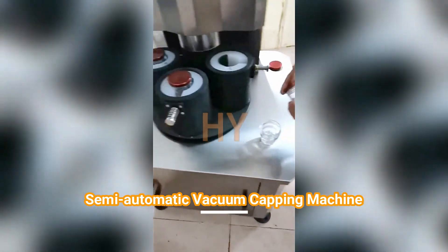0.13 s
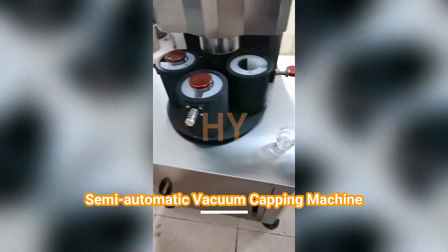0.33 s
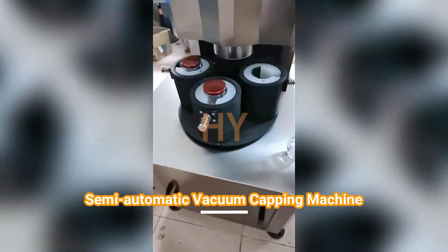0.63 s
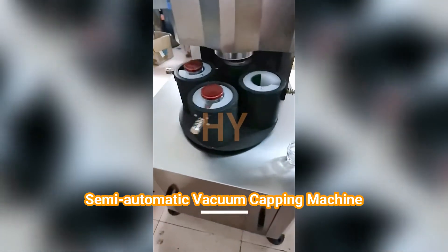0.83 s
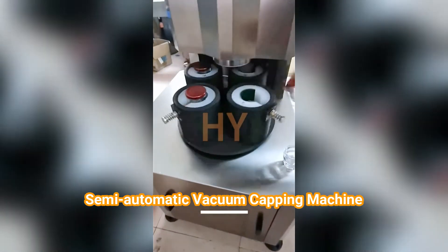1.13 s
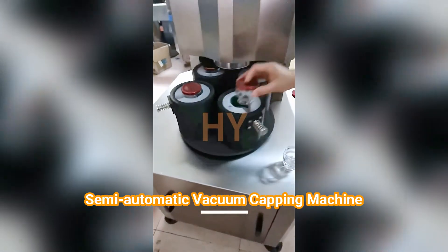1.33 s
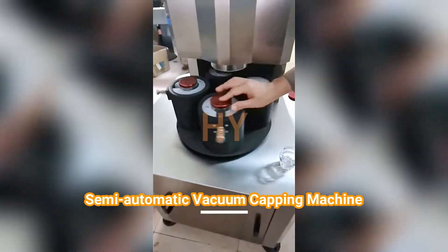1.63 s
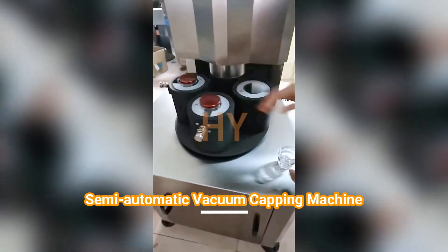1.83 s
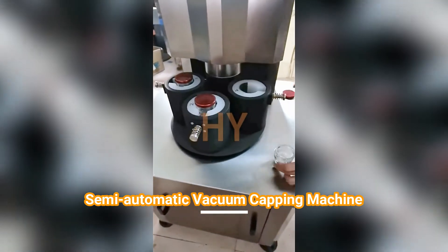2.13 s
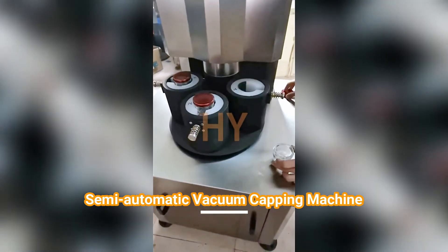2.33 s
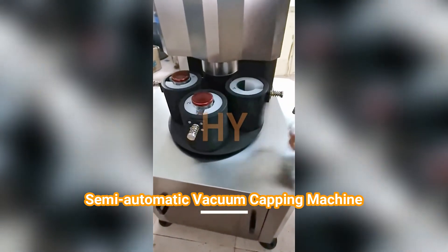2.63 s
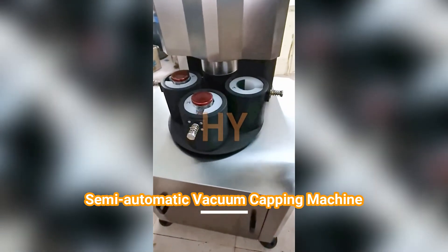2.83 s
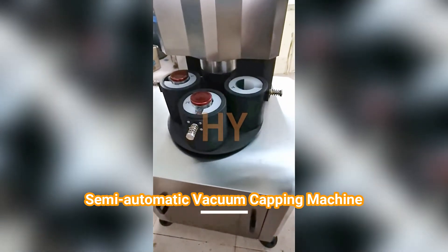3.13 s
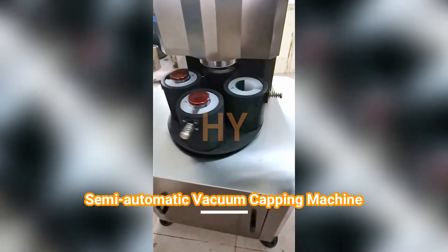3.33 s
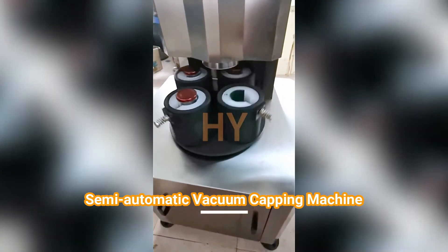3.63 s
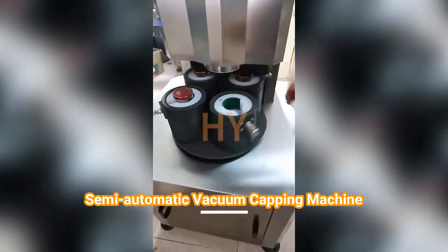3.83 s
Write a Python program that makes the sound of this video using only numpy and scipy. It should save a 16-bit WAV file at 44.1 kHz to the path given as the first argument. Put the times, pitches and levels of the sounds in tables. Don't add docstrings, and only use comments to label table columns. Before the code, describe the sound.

Close stereo microphone on a jar capping machine in a hard room: sharp air bursts, heavy metallic strokes and low cabinet ringing, a glass jar bouncing midway, then quick hisses and thuds over a starting pump hum.

```python
import sys
import numpy as np
from scipy import signal
from scipy.fft import rfft, irfft, next_fast_len
from scipy.io import wavfile
from scipy.ndimage import uniform_filter1d, map_coordinates

SR = 44100
rng = np.random.default_rng(int(sys.argv[2]) if len(sys.argv) > 2 else 0)


def natural_amplitude(level_db):
    exponent = np.asarray(level_db, float) / 20
    return 10 ** exponent


def unload_wav(signal):
    wavfile.write(
        sys.argv[1],
        SR,
        np.round(np.clip(np.atleast_2d(signal).T, -1, 1) * 32767).astype(np.int16),
    )


N = 176400
T = np.arange(N) / SR


def unit(x):
    return x / np.sqrt(np.mean(x ** 2) + 1e-20)


def along(points, hz):
    f, v = np.transpose(points)
    return np.interp(np.log(hz + 1), np.log(f + 1), v)


def wobble(rate_per_s):
    knots = rng.standard_normal(int(N * rate_per_s / SR) + 4)
    return map_coordinates(knots, [T * rate_per_s])


def filtered(x, response):
    m = next_fast_len(N + SR)
    return irfft(rfft(x, m) * response(np.fft.rfftfreq(m, 1 / SR)), m)[..., :N]


def body(peaks):
    def response(f):
        total = 0
        for k, (hz, width_hz, db) in enumerate(peaks):
            damping = 1j * f * width_hz
            total = total + (-1) ** k * natural_amplitude(db) * damping / (hz * hz - f * f + damping)
        return total
    return response


def power_of(peaks):
    return lambda hz: abs(body(peaks)(hz)) ** 2


def fade(start_s, rise_s, hold_s, t60_s):
    u = np.maximum(T - start_s, 0)
    return -np.expm1(-u / rise_s) * np.exp(-np.log(1000) * np.maximum(u - hold_s, 0) / t60_s)


def ring(start_s, hz, t60_s, hold_s=0):
    return fade(start_s, 0.00049 + 0.28 / hz, hold_s, t60_s) * np.sin(2 * np.pi * hz * (T - start_s))


def taps(rows):
    s, db = np.transpose(rows)
    return np.bincount(np.round(s * SR).astype(int), natural_amplitude(db), N)


# (frequency [Hz], correlation [0-1])
LIKENESS = [(60, 0.51), (290, 0.93), (640, 0.44), (1400, 0.1), (3100, 0.14), (15000, 0)]


def rush(gain, patchy_db):
    z = signal.stft(rng.standard_normal((2, N)), nperseg=512)[2]
    field = uniform_filter1d(uniform_filter1d(rng.standard_normal(z.shape[1:]), 6, 0), 8, 1)
    pair = signal.istft(z * natural_amplitude(patchy_db * unit(field)), nperseg=512)[1][:, :N]

    def spread(hz):
        turn = np.arccos(np.clip(along(LIKENESS, hz), -1, 1)) / 2
        return gain(hz) * np.array([np.cos(turn), np.sin(turn)])

    mid, side = filtered(pair, spread)
    return unit(np.array([mid + side, mid - side]))


# (time [s], peak [dB], body [dB], t60 [s], whistle [dB])
PUFFS = [(0.0, -29, -1.5, 0.6, -37), (0.0518, -31.5, 0, 0.4, 3), (0.1433, -23, 3.5, 0.88, -9),
         (0.546, -13, -10, 0.63, -11.5), (1.7422, -14, -5.5, 0.7, -12), (2.0485, -23, 0, 0.46, -9),
         (2.3466, -22.5, -4, 0.43, -9), (2.656, -21, 3.5, 0.7, -31), (2.786, -31, 9.5, 1, -14),
         (2.9632, -38, -6, 0.45, -14), (3.051, -13, -14, 0.59, -15)]
# (time [s], level [dB], hold [s])
VENTS = [
    (0.755, -37.5, 0.15),
    (3.252, -36, 0.17),
]
# (frequency [Hz], density [dB per Hz])
JET = [(530, -3), (900, -6.5), (1160, -9.5), (2320, -7), (5910, 1.5), (7700, -5), (8370, -10), (13800, -4),
       (15800, -3)]
# (frequency [Hz], width [Hz], level [dB])
WHISTLES = [(4127, 650, 6.5), (5570, 390, -14.5), (7100, 300, -28)]


def valves():
    trim_db, lead_s, rise_s, hold_s = -8.5, 0.0094, 0.0067, 0.013
    spit_db, spit_t60_s = 2, 0.22
    jet_from_hz = 3700
    vent = sum(natural_amplitude(db) * fade(s, 0.004, hold, 0.36) for s, db, hold in VENTS)
    swell = natural_amplitude(-36) * fade(2.545, 0.022, 0.068, 0.41)
    hiss, full, sung = vent + swell, vent + swell, natural_amplitude(-9) * vent + natural_amplitude(-1) * swell
    for s, db, body_db, t60_s, whistle_db in PUFFS:
        start_s = s - lead_s
        opening = fade(start_s, rise_s, 9, 1) ** 2
        bleed = fade(start_s, rise_s, hold_s, t60_s)
        spit = natural_amplitude(spit_db) * fade(start_s, rise_s, 0, spit_t60_s)
        puff = natural_amplitude(db + trim_db) * opening * (bleed + spit)
        hiss = hiss + puff
        full = full + natural_amplitude(body_db) * puff
        sung = sung + natural_amplitude(whistle_db) * puff

    def top(hz):
        return hz ** 4 / (hz ** 4 + jet_from_hz ** 4)

    jet = rush(lambda hz: natural_amplitude(along(JET, hz)) * top(hz), patchy_db=1.5)
    low = rush(lambda hz: natural_amplitude(along(JET, hz)) * (1 - top(hz)) * (hz > 500), patchy_db=0.5)
    gritty_low = natural_amplitude(3 * wobble(250) - 6.5) * low
    whistle = rush(power_of(WHISTLES), patchy_db=1)
    return hiss * jet + full * gritty_low + sung * whistle


# (time [s], peak [dB], boom [dB], clang [dB], rattle [s])
CLUNKS = [
    (.001, -24, 15, 3, 0.0098),
    (0.606, -9, -6, -5.5, 0.031),
    (.733, -8, 2, -9, 0.02),
    (1.845, -17.5, -5, -1, 0.023),
    (2.408, -11.5, -14, -14.5, 0.025),
    (2.791, -15.5, -10, -21, 0.029),
    (3.107, -8, -7.5, -5, 0.015),
    (3.136, -14, -12, -0.5, 0.0095),
    (3.238, -7.5, -0.5, -7.5, 0.02),
]
# (frequency [Hz], width [Hz], level [dB])
CABINET = [(113.5, 1.94, -0.5), (141.5, 1.64, -3.5), (215, 1.85, -1), (230.3, 5.9, -10),
           (280.4, 0.95, -4.5), (302.7, 1.55, -11.5)]
# (frequency [Hz], width [Hz], level [dB])
PANEL = [(154, 77, -5.5), (231.6, 41, 2.5), (697, 96, -8)]
# (frequency [Hz], width [Hz], level [dB])
PLATE = [(960, 340, -2), (1875, 290, -3.5), (2200, 126, 4.5), (2980, 1300, -6), (3800, 490, -1.5),
         (4700, 1840, -12)]


def pistons():
    lead_s, boom_late_s = 0.0089, 0.012
    blow_db, boom_db, clang_tap_db = 41.5, 64, 13
    scrape_db, rattle_db = 18.5, 6
    grit = unit(rng.standard_normal(N) * natural_amplitude(4.6 * wobble(300)))
    scrape, rattle = 0, 0
    for s, db, _, clang_db, rattle_s in CLUNKS:
        contact = natural_amplitude(db) * fade(s - lead_s, 0.00033, rattle_s, 0.044)
        scrape = scrape + contact
        rattle = rattle + natural_amplitude(clang_db) * contact
    blows = taps([(s, db + blow_db) for s, db, *_ in CLUNKS]) + natural_amplitude(scrape_db) * scrape * grit
    clangs = taps([(s, db + clang_db + clang_tap_db) for s, db, _, clang_db, _ in CLUNKS])
    clangs = clangs + natural_amplitude(rattle_db) * rattle * grit
    booms = taps([(s + boom_late_s, db + low_db + boom_db) for s, db, low_db, *_ in CLUNKS])
    panel = filtered(blows, lambda hz: body(PANEL)(hz) / (1 + 1j * hz / 500) ** 2)
    cabinet = filtered(booms, lambda hz: body(CABINET)(hz) / (1 + 1j * hz / 700) ** 2)
    shudder = natural_amplitude(3.5 * wobble(30) - 1.0)
    return panel + shudder * cabinet, filtered(clangs, body(PLATE))


# (time [s], peak [dB], ring [dB])
SPOOLS = [
    (.143, -8.5, -18),
    (.54, -25.5, -10),
    (1.737, -14.5, -19),
    (2.046, -16, -35),
    (2.381, -13, -20),
    (2.556, -21.5, -43),
    (2.645, -11, -17),
    (2.722, -9.5, -38),
]


def spools():
    total = 0
    for s, db, ring_db in SPOOLS:
        thud = ring(s, 93.6, 0.19)
        hollow = ring(s + 0.00627, 635, 0.07, 0.03)
        total = total + natural_amplitude(db) * (thud + natural_amplitude(ring_db) * hollow)
    return total


# (time [s], peak [dB], frequency [Hz], t60 [s])
PINGS = [(.024, -21, 1036, 0.021), (.628, -15.5, 2210, 0.063), (.728, -13.5, 610, 0.023),
         (0.733, -7, 186, .05), (.749, -17.5, 526, 0.17), (.79, -25.5, 397, 0.37), (1.748, -27, 6700, .08),
         (1.751, -27, 5840, 0.13), (1.756, -13.5, 2216, 0.094), (1.782, -18, 2170, 0.04),
         (1.84, -9.5, 2327, 0.063), (1.841, -10, 3580, 0.027), (1.843, -16, 1820, 0.077),
         (1.846, -7, 2246, 0.034), (1.859, -25, 1585, 0.091), (1.87, -23.5, 2280, .12),
         (1.962, -28.5, 2290, 0.073), (2.06, -28, 635, 0.028), (2.064, -25, 1100, 0.046),
         (2.079, -28.5, 650, .04), (2.116, -28, 897, 0.12), (2.348, -24.5, 115, 0.078),
         (2.41, -29.5, 525, 0.48), (2.496, -15.5, 110, 0.059), (2.66, -27, 615, .1),
         (2.776, -19, 613, 0.11), (2.799, -19, 1170, 0.055), (3.103, -14, 215, 0.053),
         (3.131, -19, 2300, .04), (3.236, -8, 191, 0.056), (3.239, -17.5, 2196, 0.056),
         (3.25, -17, 521, 0.13)]
# (time [s], peak [dB])
CLICKS = [
    (0.214, -13),
    (.451, -11),
    (0.609, -12),
    (1.84, -18),
    (3.102, -11),
    (3.132, -18),
]


def pings():
    modes = sum(natural_amplitude(db) * ring(s, hz, t60_s, 0.002) for s, db, hz, t60_s in PINGS)
    clicks = sum(natural_amplitude(db) * fade(s, 0.00088, 0.0012, 0.026) for s, db in CLICKS) * rng.standard_normal(N)
    dry_clicks = filtered(clicks, lambda hz: 1j * hz / (1j * hz + 600) / (1 + 1j * hz / 6960))
    return natural_amplitude(1.5 * wobble(150)) * modes + dry_clicks


# (time [s], peak [dB], low mode [Hz], high mode [Hz], high mode [dB])
TICKS = [
    (.025, -28, 1044, 3600, 1),
    (0.051, -24, 1015, 3630, -6),
    (.215, -29, 1340, 3750, 4),
    (.329, -20.5, 1025, 4013, 2.5),
    (0.45, -26.5, 1358, 5500, -8.5),
    (1.478, -41.5, 1000, 2050, -17),
    (1.701, -38, 1100, 2200, -23),
    (2.73, -22, 1184, 3400, -17),
    (2.965, -27.5, 980, 1600, 2.5),
    (3.072, -23.5, 1030, 1460, -12),
]


def ticks():
    t60_s, hold_s = 0.014, 0.004
    small, snaps = 0, 0
    for s, db, low_hz, high_hz, high_db in TICKS:
        low = ring(s, low_hz, t60_s, hold_s) + 0.9 * ring(s, 1.44 * low_hz, t60_s)
        high = natural_amplitude(high_db) * ring(s, high_hz, t60_s, hold_s)
        small = small + natural_amplitude(db + 4.5) * (low + high)
        snap = fade(s, 0.0039, hold_s, 0.022) + natural_amplitude(-34) * fade(s, 0.015, 0, 0.16)
        snaps = snaps + natural_amplitude(db + high_db + 5.5) * snap
    dry_snaps = filtered(snaps * rng.standard_normal(N), lambda hz: 1j * hz / (1j * hz + 700))
    return natural_amplitude(4.1 * wobble(900)) * small + dry_snaps


# (time [s], peak [dB], frequency [Hz], hold [s])
CHIRPS = [
    (.052, -28, 3700, 0.011),
    (.053, -29, 4980, .01),
    (.147, -33, 3320, 0.056),
    (.23, -38.5, 3440, 0.074),
    (0.549, -22, 7600, 0.021),
    (0.561, -27, 5840, 0.015),
    (1.743, -21, 6270, .015),
    (2.349, -24.5, 4200, 0.021),
    (2.571, -31, 4100, 0.023),
    (3.049, -26, 7600, .03),
]


def chirps():
    return sum(natural_amplitude(db) * ring(s, hz, 0.13, hold_s) * wobble(500) for s, db, hz, hold_s in CHIRPS)


# (time after drop [s], level [dB])
JAR_BOUNCE = [
    (0, 3.5),
    (.004, -7),
    (.008, -18),
    (.017, -3),
    (0.023, -11.5),
]
# (frequency [Hz], width [Hz], level [dB])
JAR = [(548, 48, -11), (969, 47, 3), (1102, 26, 7.5), (1290, 180, -15), (1517, 44, 4), (2110, 140, -8.5),
       (2530, 170, -12.5), (3640, 460, -21), (4270, 230, -20), (6060, 300, -29)]
# (frequency [Hz], width [Hz], level [dB])
HOLDER = [(670, 670, 1), (1210, 590, 5), (2440, 2400, -7)]


def jar():
    drop_s, drop_db = 1.507, 28
    hits = taps([(drop_s + s, drop_db + db) for s, db in JAR_BOUNCE])
    knock = filtered(hits, lambda hz: body(JAR)(hz) / (1 + 1j * hz / 5000) ** 2)
    murmur = natural_amplitude(-28) * fade(drop_s, 0.0084, 0, 0.77) * rush(power_of(HOLDER), patchy_db=1.5)
    return knock, murmur


# (frequency [Hz], width [Hz], level [dB])
FRAME = [(78, 45, -2.5), (127, 70, 0.5), (211, 102, -2), (475, 168, -8.5), (1100, 770, -11)]


def stand():
    kicks = [(s, db + boom_db) for s, db, boom_db, *_ in CLUNKS]
    kicks += [(s, db - 3.5) for s, db, _ in SPOOLS]
    power = sum((natural_amplitude(db - 12.5) * fade(s, 0.0065, 0, 0.95)) ** 2 for s, db in kicks)
    return np.sqrt(power) * rush(power_of(FRAME), patchy_db=1.2)


# (time [s], speed [Hz], level [dB])
PUMP = [
    (2.754, 100.3, -20),
    (2.785, 99.8, -16),
    (2.9, 99.47, -15),
    (3.15, 99.83, -18),
    (3.4, 99.08, -19),
    (3.6, 99.4, -18.5),
    (4, 98.75, -19),
]
# (multiple of speed, level [dB])
PUMP_ORDERS = [(1, 1), (1.5, -38), (2, -13.5), (2.5, -37), (3, -21.5)]
# (frequency [Hz], density [dB per Hz])
PUMP_AIR = [(24, -75), (40, -25), (66, -22), (103, -1), (151, -13.5), (296, -17.5), (488, -24), (1060, -24),
            (15800, -58.5)]


def pump():
    s, hz, db = np.transpose(PUMP)
    level = natural_amplitude(np.interp(T, s, db, left=-120))
    phase = 2 * np.pi * np.cumsum(np.interp(T, s, hz) + 0.72 * wobble(11)) / SR
    hum = sum(natural_amplitude(order_db + 1.2 * k * wobble(24.84)) * np.sin(k * phase + k - 1)
              for k, order_db in PUMP_ORDERS)
    air = rush(lambda f: natural_amplitude(along(PUMP_AIR, f)), patchy_db=1.7)
    chopped = air * (1 + 0.088 * np.sin(phase))
    return level * (np.sqrt(2) * hum + natural_amplitude(-5 + 0.8 * wobble(18)) * chopped)


# (frequency [Hz], t60 [s])
ROOM = [(150, 0.67), (1000, 0.91), (4000, 0.56), (12000, 0.075)]


def room(x):
    hz, t, z = signal.stft(rng.standard_normal((2, SR)), SR, nperseg=256)
    decay = natural_amplitude(-60 * t / along(ROOM, hz)[:, None])
    tail = signal.istft(z * decay, SR, nperseg=256)[1]
    late = np.pad(x, (300, 0))[None]
    return signal.fftconvolve(late, tail / np.linalg.norm(tail[0]), axes=1)[:, :N]


# (frequency [Hz], density [dB per Hz])
HALL = [(30, -9), (70, -24), (100, -1), (180, -14.5), (290, -4.5), (370, -21), (1100, -24), (4300, -33),
        (15800, -47.5)]


def hall():
    return natural_amplitude(-41.5 + 0.8 * wobble(5.68)) * rush(lambda hz: natural_amplitude(along(HALL, hz)), patchy_db=1.5)


# (frequency [Hz], left over right [dB])
LEAN = [(60, 4.5), (240, -2.5), (950, 2), (3770, 6), (15000, -2.5)]


def scene():
    lag_s, clang_wet_db, light_wet_db, wet_db = 0.00015, -7, -20, -3
    sides = np.array([[1], [-1]])
    air = valves()
    thud, clang = pistons()
    knock, murmur = jar()
    light = ticks() + pings() + chirps() + knock + spools()
    hits = thud + clang + light
    near = filtered(np.array([hits, hits]), lambda hz: np.exp(1j * np.pi * hz * lag_s * sides))
    lean = filtered(near + air, lambda hz: natural_amplitude(along(LEAN, hz) / 2 * sides))
    sent = thud + natural_amplitude(clang_wet_db) * clang + natural_amplitude(light_wet_db) * light + air[0]
    echo = filtered(room(sent), lambda hz: hz ** 4 / (hz ** 4 + 380 ** 4))
    return lean + murmur + natural_amplitude(wet_db) * echo + pump() + stand() + hall()


def roll_off(x):
    return signal.sosfilt(signal.butter(12, 15950, fs=SR, output="sos"), x)


def record(dry):
    low_cut_hz, top_hz, ceiling = 55.4, 15950, 0.9
    x = filtered(dry, lambda hz: (1j * hz / (1j * hz + low_cut_hz)) ** 2 * (hz < top_hz))
    mix = x / (1 + abs(x / ceiling) ** 6) ** (1 / 6)
    return roll_off(mix)


dry = scene()
out = record(dry)
unload_wav(out)
```